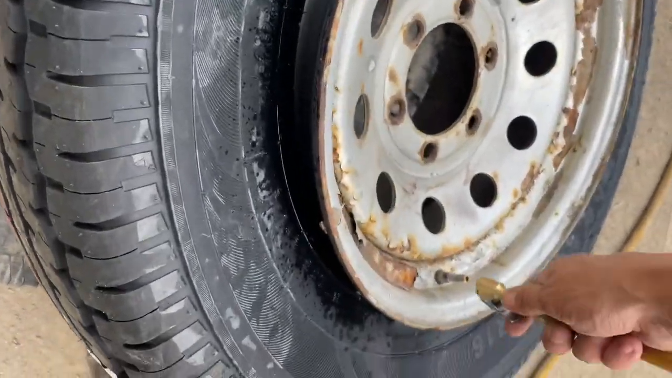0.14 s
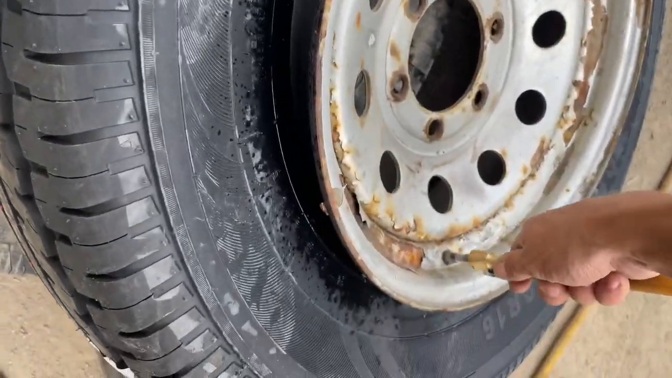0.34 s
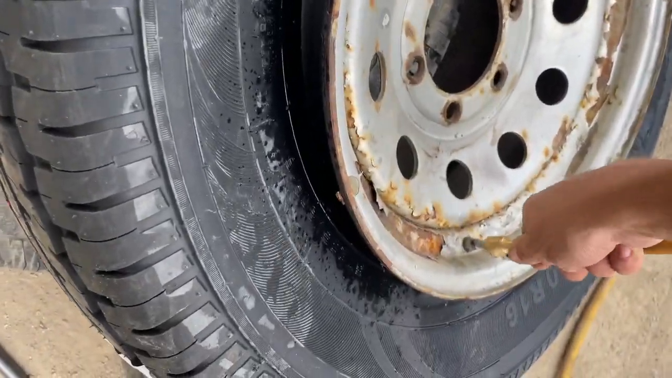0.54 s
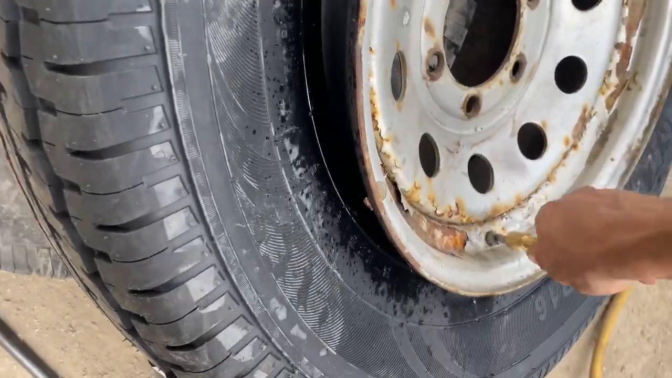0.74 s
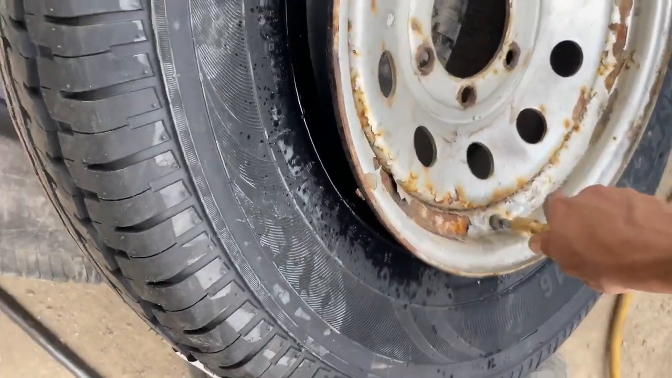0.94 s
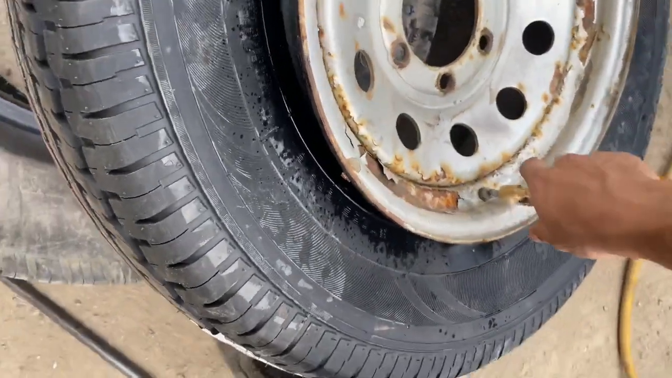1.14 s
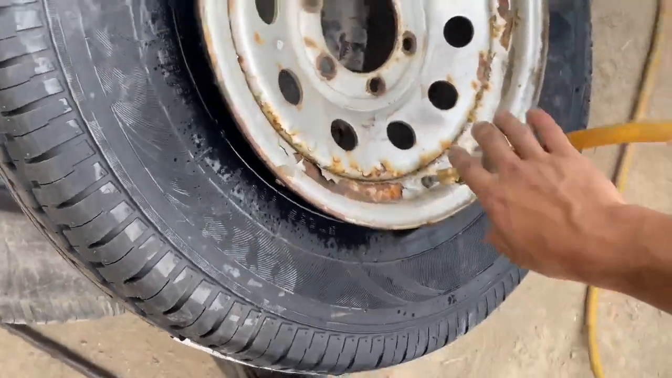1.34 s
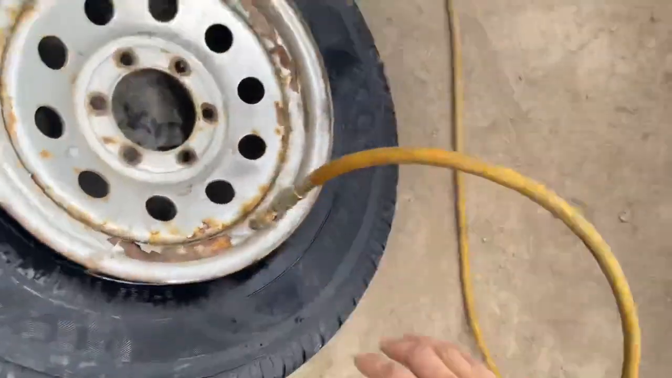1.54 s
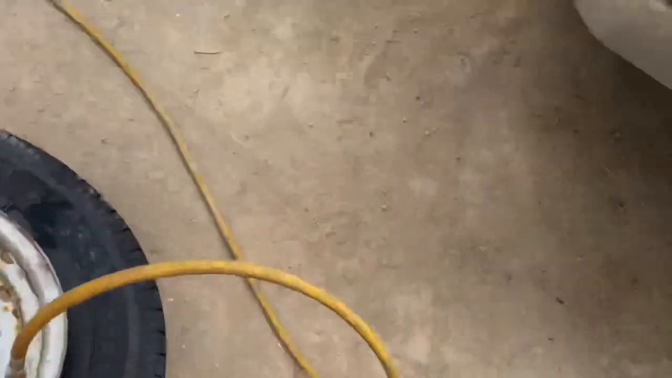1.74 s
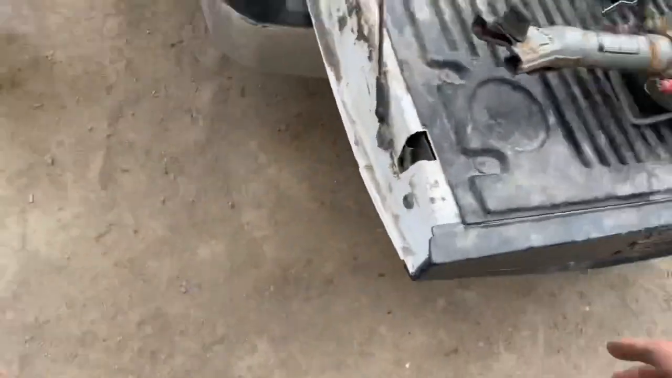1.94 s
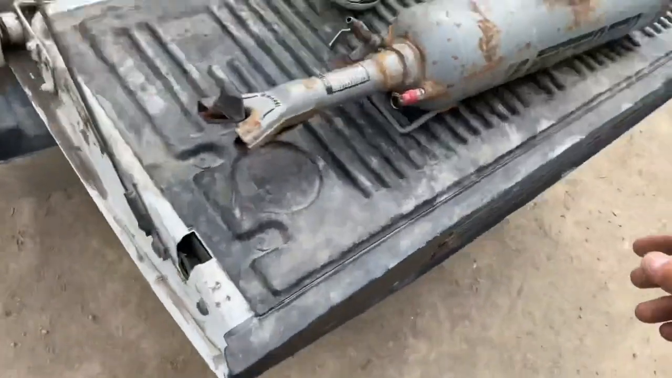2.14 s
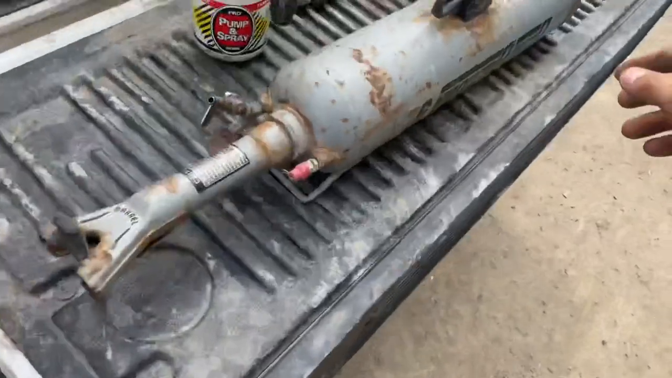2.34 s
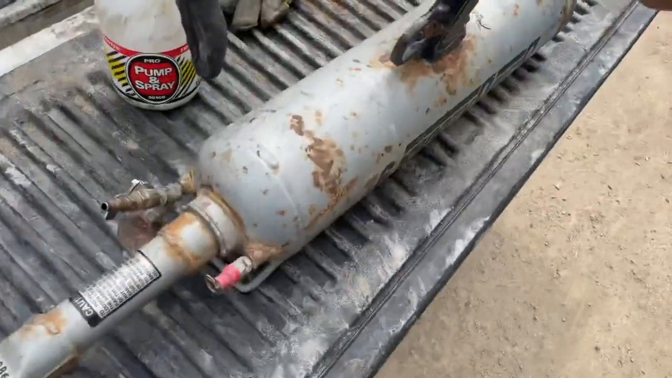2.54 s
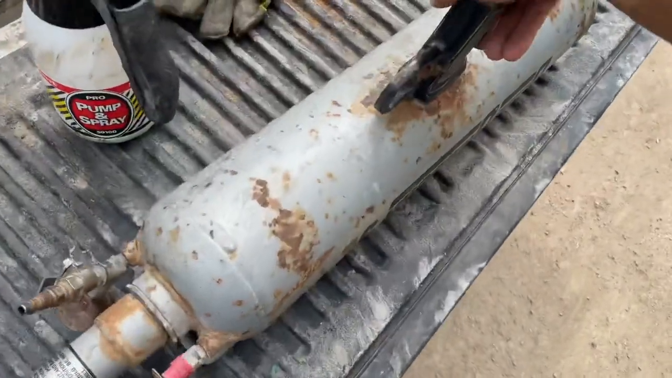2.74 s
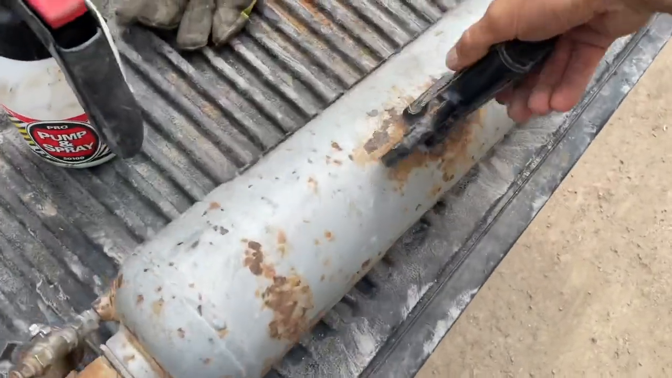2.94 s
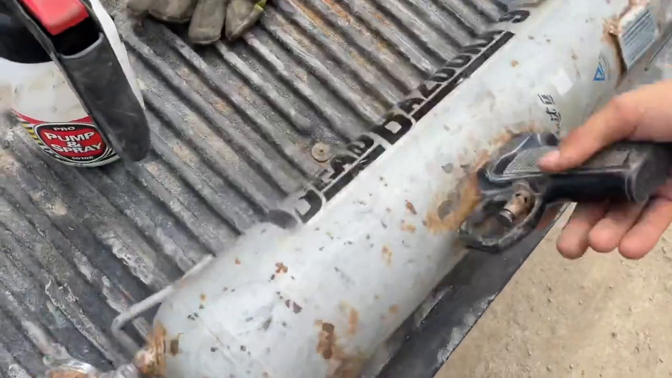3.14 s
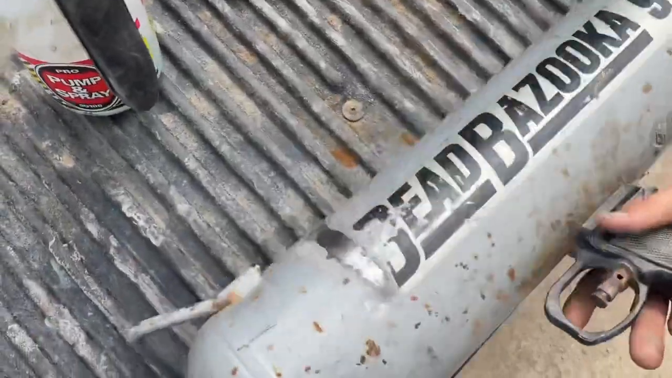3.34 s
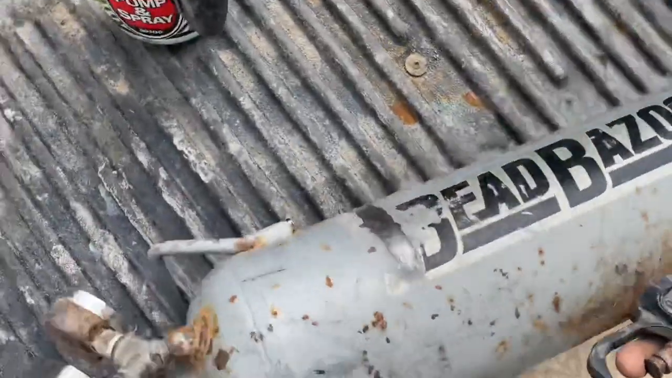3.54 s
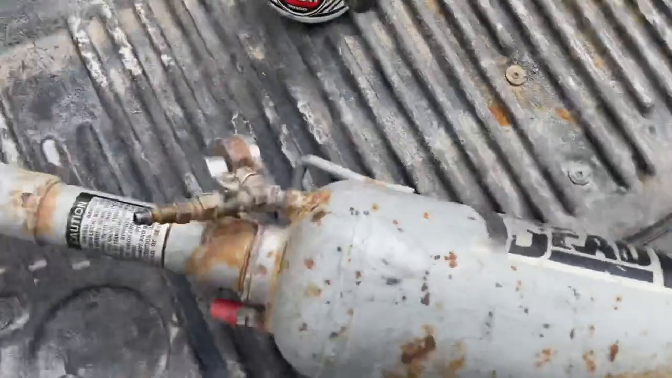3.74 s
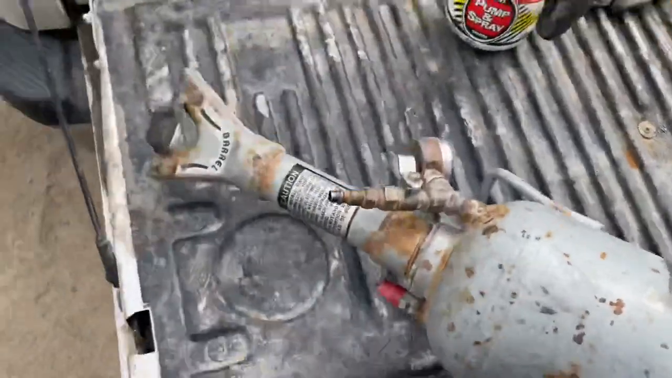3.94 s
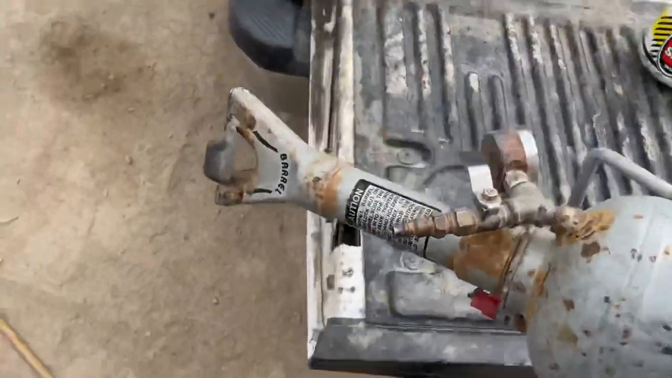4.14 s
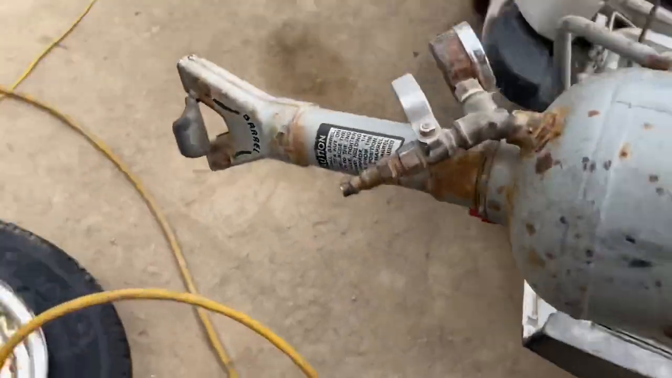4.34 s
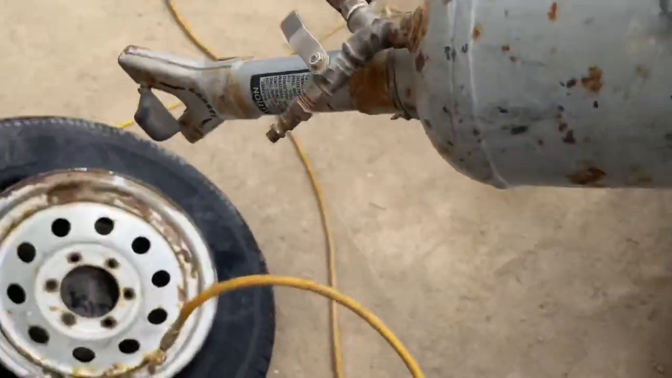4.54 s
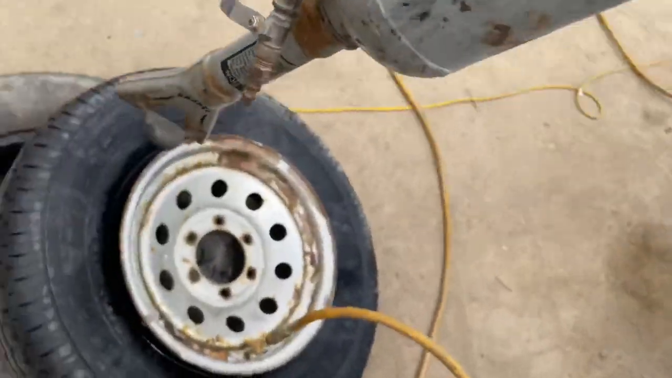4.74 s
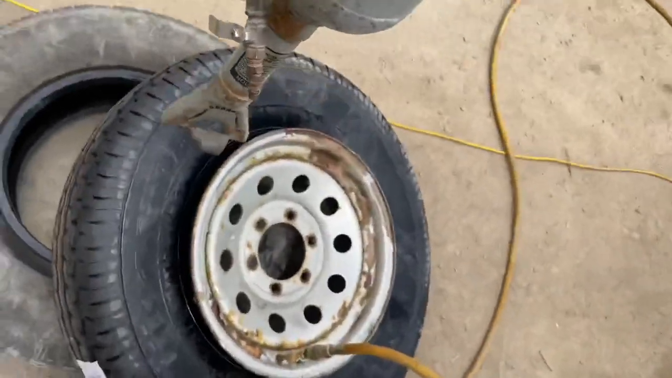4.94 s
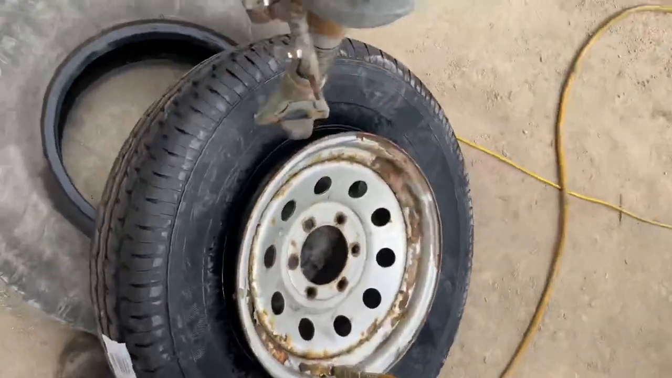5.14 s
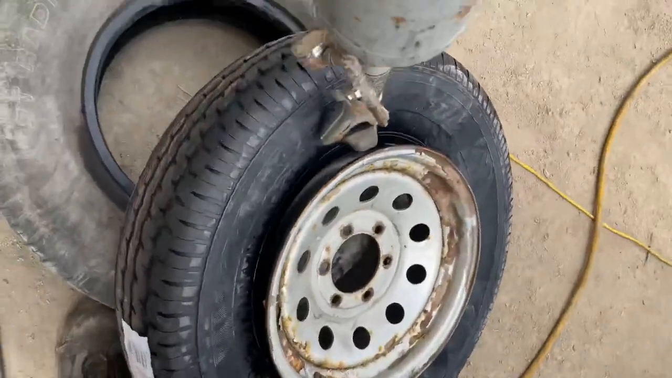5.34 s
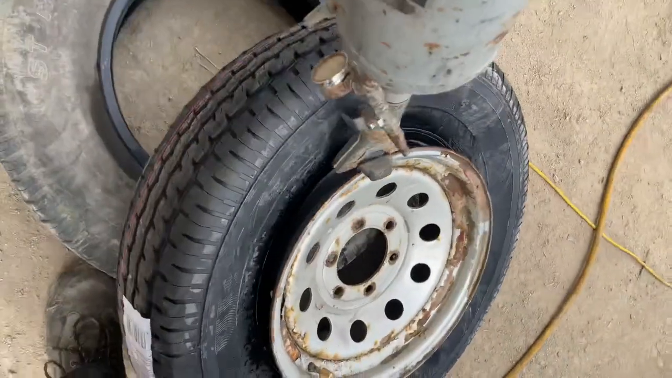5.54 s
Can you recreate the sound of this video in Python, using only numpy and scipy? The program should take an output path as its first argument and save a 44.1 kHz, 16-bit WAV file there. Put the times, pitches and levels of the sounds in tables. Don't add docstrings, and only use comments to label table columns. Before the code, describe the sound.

An air chuck ticks against a wheel and snaps onto its valve; a steady bright hiss follows, dipping mid-way, over faint engine drone.

```python
import sys
import numpy as np
from scipy import signal
from scipy.fft import next_fast_len
from scipy.io import wavfile
from scipy.ndimage import uniform_filter1d

SR = 44100
rng = np.random.default_rng(int(sys.argv[2]) if len(sys.argv) > 2 else 0)


def dump_mix(stems):
    frames = np.atleast_2d(stems).T
    limited = np.clip(frames, -1, 1)
    pcm = np.round(limited * 32767).astype(np.int16)
    wavfile.write(sys.argv[1], SR, pcm)


def amplitude_ratio(level_db):
    exponent = np.asarray(level_db, float) / 20
    return 10 ** exponent


N = 250929
HOP = 128

# start_s, level_db
YARD_LEVEL = [(0, -44), (.16, -49), (.32, -45), (.58, -43.5), (.75, -48), (1.08, -48), (1.2, -58),
              (1.73, -58.5), (2.05, -65), (2.5, -60), (2.8, -58), (3.22, -61.5), (3.5, -54), (3.88, -54.5),
              (4.4, -47.5), (5.07, -46), (5.69, -47.5)]
# start_s, half_spacing_hz, half_width_hz, shadow_lifted (0-1)
DIP_SHAPE = [(.55, 350, 60, .15), (1.36, 360, 60, .15), (1.4, 0, 150, .4), (2.2, 0, 130, .5),
             (2.48, 0, 190, .3), (2.6, 0, 120, .1), (3.3, 0, 100, .1), (3.45, 0, 150, .4),
             (3.7, 0, 140, .6), (4.58, 0, 100, .5), (4.6, 0, 190, .3), (4.78, 0, 190, .5),
             (4.81, 410, 150, .7), (4.95, 410, 150, .7), (4.98, 0, 330, .9), (5.07, 0, 200, .9),
             (5.12, 0, 340, .9), (5.22, 0, 340, .9), (5.28, 0, 210, .9), (5.42, 0, 170, .9),
             (5.44, 0, 310, .9), (5.69, 0, 300, .9)]


def evened(x):
    return x / np.sqrt(np.mean(x ** 2) + 1e-20)


def read(points, hz):
    f, *values = np.transpose(points)
    return [np.interp(np.log(hz + 1), np.log(f + 1), v) for v in values]


def follow(rows, t):
    s, *values = np.transpose(rows)
    return [np.interp(t, s, v) for v in values]


def add(mix, s, sound):
    part = mix[round(s * SR):][:len(sound)]
    part += sound[:len(part)]


def bell(hz, centre_hz, width_hz):
    return np.exp(-((hz - centre_hz) / width_hz) ** 2)


def flat(hz, centre_hz, width_hz):
    return np.exp(-((hz - centre_hz) / width_hz) ** 4)


def grid():
    return np.arange(N // HOP + 5)[:, None] * HOP / SR, np.fft.rfftfreq(4 * HOP, 1 / SR)


def streaks(shape):
    slow = uniform_filter1d(rng.standard_normal(shape), size=110, axis=0)
    return evened(uniform_filter1d(slow, size=2, axis=1))


def wander(t):
    return streaks((len(t), 2))[:, :1]


def noise_pair(field_db, same, phase, shadow_db, patchy_db):
    a, b, c, d = np.moveaxis(rng.standard_normal(field_db.shape + (4,)), 2, 0)
    same = np.clip(same, 0, 1)
    left = a + 1j * b
    right = same * left + np.sqrt(1 - same ** 2) * (c + 1j * d)
    right = right * np.exp(-1j * phase) * amplitude_ratio(-shadow_db)
    z = np.array([left, right]) * amplitude_ratio(field_db + patchy_db * streaks(field_db.shape))
    return signal.istft(z.transpose(0, 2, 1), nperseg=4 * HOP, noverlap=3 * HOP)[1][:, :N] / np.sqrt(HOP)


def lagging(x):
    bass_lead = 0.57
    return (signal.hilbert(x, next_fast_len(len(x)))[:len(x)] * np.exp(-1j * bass_lead)).real


def low_band(hz, width_hz, spread):
    pole = np.exp(-np.pi * width_hz / SR)
    ring = [1, -2 * pole * np.cos(2 * np.pi * hz / SR), pole ** 2]
    once = signal.lfilter([1], ring, rng.standard_normal((2, N)))
    low = signal.lfilter([1, -1], ring, once)
    return evened(low[0] + spread * low[1] * [[1], [-1]]) * amplitude_ratio([[1.5], [-1.5]])


def yard_layer(s, db, slope, fade_db, lift_db):
    yard_db = follow(YARD_LEVEL, s)[0] + 50
    lift = bell(s, 3.1, 1)
    return amplitude_ratio(db + slope * yard_db - fade_db * s + lift_db * lift)


def engine_throb(s):
    # start_s, level_db
    puffs = [
        (0.01, -44),
        (.097, -36),
        (.14, -35.5),
        (.235, -39),
        (.28, -32.5),
        (.33, -41),
        (.404, -34.5),
        (.442, -37),
        (.534, -41),
        (.61, -40),
    ]
    hz = 80 + 4 * evened(uniform_filter1d(rng.standard_normal(N), size=3000))
    throb = np.sin(2 * np.pi * np.cumsum(hz) / SR)
    throb *= sum(amplitude_ratio(db + 5.5) * bell(s, at, 0.026) for at, db in puffs)
    return np.array([throb, lagging(throb)]) * amplitude_ratio([[1.5], [-1.5]])


def yard():
    # pitch_hz, level_db
    drone_colour = [(90, -14), (180, -18), (232, 11), (290, -12.5), (340, -4), (450, 2), (700, -6),
                    (1200, -2.5), (1600, -6), (2500, -24.5), (4000, -32.5), (9000, -45), (13000, -48),
                    (16000, -75)]
    t, hz = grid()
    s = np.arange(N) / SR
    drone_db = follow(YARD_LEVEL, t)[0] + read(drone_colour, hz)[0] + 12
    port_phase = 2 * np.pi * hz * 14 / SR
    drone = noise_pair(drone_db, 0.94 / (1 + hz / 2500), port_phase, 0.94, patchy_db=2.0)
    drone = signal.lfilter(*signal.butter(3, 75, "high", fs=SR), drone)
    rumble = low_band(68.0, 49, spread=0.14) * yard_layer(s, db=-51.5, slope=2.5, fade_db=3.5, lift_db=16)
    hum = low_band(147.0, 60, spread=0.18) * yard_layer(s, db=-53, slope=1.6, fade_db=1.5, lift_db=12.5)
    knock = low_band(228, 78, spread=0.28) * amplitude_ratio(-47.5) * flat(s, 0, 0.89)
    return drone + rumble + hum + knock + engine_throb(s)


def clinks():
    # start_s, tick_db,
    # scrape_db, ring_db, pitch_hz
    touches = [(.003, -35, -54, -77, 4020), (.051, -40, -78, -90, 5800), (.084, -39.5, -83, -92, 8200),
               (0.312, -36, -31, -34, 2130), (0.311, -45, -66, -83, 8000), (.311, -43, -64, -90, 13000),
               (.327, -56, -73, -72, 9000), (0.351, -46, -37, -44, 3630), (.312, -44, -48, -48, 3900),
               (.351, -44, -60, -90, 2200), (0.357, -40, -47, -60, 13000), (0.363, -28, -57, -31.5, 6300),
               (.363, -42, -65, -90, 13500), (.370, -34, -47, -72, 5430), (.378, -42, -39, -70, 4430),
               (.378, -31, -52, -90, 15500), (.410, -35, -56, -90, 15500), (.357, -36, -54, -90, 15500),
               (0.403, -40, -69, -70, 13500), (0.379, -31, -61, -66, 11000), (0.388, -42, -64, -68, 12000),
               (.393, -30, -54, -90, 15500), (0.402, -37, -28, -40.5, 1570), (.410, -38, -65, -62, 10000),
               (0.456, -36, -45, -37, 13100), (.456, -60, -56, -73, 6000), (0.529, -65, -38, -90, 6800),
               (.532, -60, -34, -87, 12500), (0.534, -60, -27, -90, 3300), (.5422, -11, -42, -90, 12000)]
    # pitch_hz, level_db, t60_s
    rim_modes = [(1507, -10, .06), (1620, -3, .6), (2188, 0, .5), (2775, -26, .4), (3800, -30, .2),
                 (4100, -30, .2), (4468, -30, .14), (6335, -24, .5), (12750, 0, .045), (12350, -4, .035),
                 (13200, -6, .03)]
    miss_db = -60
    land_s, damp_db_per_s, damp_below_hz = .402, 260, 3000
    out, t = np.zeros(N), np.arange(SR // 3) / SR
    all_phases = rng.random((len(touches), len(rim_modes)))
    for (s, tick_db, scrape_db, ring_db, hz), phases in zip(touches, all_phases):
        band = signal.butter(2, [.75 * hz, min(1.3 * hz, SR // 2 - 100)], "band", fs=SR)
        tick = signal.lfilter(*band, rng.standard_normal(len(t)))
        tick *= amplitude_ratio(tick_db - 60 * t / 0.0055) + amplitude_ratio(scrape_db - 60 * t / 0.13)
        damp_db = damp_db_per_s * np.maximum(s + t - land_s, 0) * (s < land_s - .001)
        ring = np.zeros(len(t))
        for (f, db, t60), p in zip(rim_modes, phases):
            mode_db = db + miss_db * np.log2(f / hz) ** 2 - 60 * t / t60 - damp_db * (f < damp_below_hz)
            ring += amplitude_ratio(mode_db) * np.sin(2 * np.pi * (f * t + p))
        add(out, s, tick + amplitude_ratio(ring_db) * ring * np.minimum(t / 0.00016, 1))
    return np.array([out, amplitude_ratio(-3) * np.roll(out, 1)])


def bumps():
    # start_s, peak_db, start_pitch_hz, end_pitch_hz
    blows = [(0.544, -34, 910, 60), (0.565, -26.5, 493, 70), (0.611, -22.5, 810, 94), (.634, -13, 900, 49),
             (0.655, -20, 880, 55.3), (.948, -22, 790, 98), (0.964, -18, 910, 63.6),
             (0.971, -17.5, 2580, 71.6), (0.989, -12.5, 1370, 41.2), (1.02, -20, 880, 61),
             (1.029, -23, 785, 44), (1.062, -16, 1290, 73), (1.104, -28.5, 806, 90), (1.124, -31, 600, 201),
             (1.149, -25.5, 1570, 150), (1.157, -28, 1190, 84), (1.172, -38, 700, 119),
             (3.36, -44, 250, 140), (3.412, -39, 600, 303), (3.43, -39.5, 497, 200), (3.45, -39, 490, 250),
             (3.475, -43, 500, 300), (3.573, -38, 700, 450), (3.579, -22, 720, 410),
             (3.590, -24.5, 594, 300), (3.596, -28.5, 504, 250), (3.606, -36, 497, 248),
             (3.620, -33.5, 220, 140)]
    out, t = np.zeros(N), np.arange(SR // 6) / SR
    for s, db, start_hz, end_hz in blows:
        t60 = 0.03 + 3 / end_hz
        hz = end_hz + (start_hz - end_hz) / (1 + t * start_hz / 2.57) ** 1.884
        rattle = evened(signal.lfilter(*signal.butter(1, 900, fs=SR), rng.standard_normal(len(t))))
        blow = np.sin(2 * np.pi * np.cumsum(hz) / SR) + 0.5 * rattle * amplitude_ratio(-60 * t / 0.096)
        add(out, s, blow * amplitude_ratio(db - 60 * t / t60) * np.minimum(t / 0.0026, 1))
    return np.array([out, amplitude_ratio(-4) * lagging(np.roll(out, 11))]) * amplitude_ratio(2.)


def valve(s):
    seat_s = .5425
    leak_db = -1 + 3000 * (s - seat_s)
    burst_db = 7 * bell(s, seat_s, .016)
    return np.where(s < seat_s, leak_db, burst_db)


def jet_spectrum(t, hz, level_db, far, aim):
    # pitch_hz, level_db
    near_colour = [(500, -10.5), (1120, -8), (1400, -12.5), (2400, 1.5), (3200, 9), (4000, 8), (4800, 7),
                   (6200, 1.5), (7500, 11.5), (9000, 8), (10200, 5.5), (12000, 6.5), (13500, -1.5),
                   (15800, -4)]
    far_colour = [(500, -3), (1120, 11), (1400, 19), (2000, 10.5), (3200, 7.5), (4000, 5), (4800, 2),
                  (6200, 17.5), (7500, 5.5), (9000, 9), (10200, 11), (12000, 5.5), (13500, 2.5),
                  (15800, 8.5)]
    # start_s, pitch_hz, depth_db
    ground_echo = [
        (1.15, 600, 0),
        (1.45, 750, -9),
        (1.65, 720, -12),
        (1.95, 1100, -7),
        (2.2, 1900, 0),
    ]
    field_db = level_db - 4 + (1 - far) * read(near_colour, hz)[0] + far * read(far_colour, hz)[0]
    field_db += aim * 12.5 * bell(hz, 12770, 2490)
    field_db += 0.6 * bell(hz, 1900, 4200)
    field_db -= (17 + 6 * wander(t)) * bell(hz, 5640 + 55 * wander(t), 140)
    field_db -= 5 * bell(hz, 7490, 205) + 4 * bell(hz, 3710, 130)
    flutter = evened(uniform_filter1d(rng.standard_normal(t.shape), size=25, axis=0))
    field_db += 0.86 * flutter
    echo_hz, echo_db = follow(ground_echo, t)
    return field_db + echo_db * bell(hz, echo_hz, .42 * echo_hz)


def direct_line(t):
    # start_s, end_s, share_lost (0-1)
    blocked = [
        (1.68, 2.0, .14),
        (2.2, 2.44, .17),
        (2.54, 3.4, .13),
        (3.57, 3.66, .12),
        (4.0, 4.48, .1),
        (5.27, 5.44, .008),
    ]
    lost = 0
    for a, b, share in blocked:
        lost = lost + share * (np.tanh((t - a) / .05) - np.tanh((t - b) / .05)) / 2
    return np.clip(.996 - lost, 0, 1)


def port_delay(t, hz, far, steep, dip_hz):
    turn = np.pi * ((hz + 1) / dip_hz) ** np.where(hz < dip_hz, np.clip(steep, .2, 3), 1.3)
    turn -= np.clip(.2 + .4 * (steep - 1), .04, .44) * np.sin(2 * turn)
    opposed = bell(turn, np.pi, .8)
    turn += .6 * bell(hz, 700, 500) * (1 - far)
    turn += np.pi * (1 + np.tanh((hz - 780) / 260)) * (t < 1.38)
    turn += .8 * streaks(turn.shape) * (1.12 - opposed)
    turn += .15 * np.sin(2 * np.pi * hz / 720 + 1.5 * t) * (1 - far)
    return turn, opposed


def treble_likeness(t, hz):
    # pitch_hz, left_lead_rad, likeness (0-1)
    ports = [(5000, 5.5, .3), (6500, 5.2, .45), (7500, 3.7, .65), (8300, 3.45, .75), (8900, 3.25, .95),
             (9350, 3.12, .99), (9900, 2.6, .8), (11000, 1.8, .78), (12200, .8, .82), (13000, 0., 1.)]
    # start_s, pitch_hz, likeness_lost just below it (0-1)
    opposite = [(.55, 8900, 0), (.82, 8950, 0), (.92, 9250, .3), (1.5, 9250, .25), (1.9, 9400, .25),
                (3.4, 9350, .15), (3.6, 9600, .3), (4.15, 9550, .2), (4.3, 9200, 0), (4.6, 9250, .2),
                (4.8, 9200, 0), (5.69, 9200, 0)]
    opposite_hz, lost = follow(opposite, t)
    phase, same = read(ports, hz * 9300 / opposite_hz)
    same = same * (1 - lost * bell(hz, opposite_hz - 750, 500))
    return same * np.exp(1j * phase)


def cancelling(t, hz, dip_hz):
    # start_s, end_s,
    # pitch_hz, half_width_hz, share (0-1)
    thin_dips = [(.56, .72, 5720, 190, 1), (.8, 1.13, 5650, 240, 1), (1.18, 1.41, 5650, 220, 1),
                 (.56, .79, 7580, 290, 1), (.82, 1.06, 7320, 270, 1), (.56, .77, 2980, 150, 1),
                 (.55, .6, 3620, 150, 1), (.77, .81, 3680, 200, 1), (.83, 1.28, 3630, 175, 1),
                 (1.31, 1.41, 3630, 175, 1), (.91, 1.04, 2750, 110, 1), (1.1, 1.2, 2900, 140, 1),
                 (1.04, 1.14, 6250, 80, .95), (1.42, 1.51, 3270, 170, 1), (3.74, 3.9, 2550, 90, .85),
                 (4.58, 4.97, 1520, 170, .7), (4.67, 4.8, 3880, 80, .95), (4.72, 4.8, 2550, 90, .95),
                 (5.32, 5.42, 2700, 80, .9)]
    gap_hz, width_hz = follow(DIP_SHAPE, t)[:2]
    dip_hz = dip_hz + 25 * wander(t)
    share = np.maximum(flat(hz, dip_hz - gap_hz, width_hz), flat(hz, dip_hz + gap_hz, width_hz))
    for a, b, thin_hz, thin_width_hz, part in thin_dips:
        present = flat(t, (a + b) / 2, (b - a) / 2)
        share = np.maximum(share, part * present * flat(hz, thin_hz, thin_width_hz))
    return share


def port_shadow(t, hz, far, shadow_db, opposed):
    shade = (1 - follow(DIP_SHAPE, t)[2] * opposed) * hz / (hz + 300)
    shade = shade * (1 - 0.38 * bell(hz, 6350, 620)) / (1 + (hz / 7450) ** 24)
    shade_db = shadow_db * shade - 4.1 * far * bell(hz, 9500, 350)
    return shade_db + 3.5 * streaks(opposed.shape) * (1 - opposed) / (1 + (hz / 8200) ** 12)


def jet():
    # start_s, level_db, distance (0 near - 1 far), nozzle_aim (about 0-1)
    walk = [(.56, -22, 0.38, .6), (.78, -28.5, 0.26, .85), (.93, -23.5, 0.38, .75), (1.06, -25, 0.42, .9),
            (1.32, -27.5, 0.52, .8), (1.55, -29, 0.51, .8), (1.76, -32.5, 0.72, 1), (1.96, -36, 0.79, 1),
            (2.24, -41.5, 0.78, .55), (2.6, -39, 0.74, .45), (3.06, -38.5, 0.71, .4),
            (3.5, -37.5, 0.76, .55), (3.85, -34, 0.69, .65), (4.2, -32, 0.59, .9), (4.4, -32.5, 0.64, 1.1),
            (4.65, -29.5, 0.46, .8), (4.96, -27.5, 0.44, .4), (5.69, -27, 0.31, .55)]
    # start_s, right_shadow_db, phase_steepness below the dip
    side_on = [(.55, 6.5, 1.4), (.85, 6.5, 1.6), (1.4, 8, 2.1), (1.72, 8.5, 0.37), (2.15, 13, 1.3),
               (2.8, 17.5, 0.27), (3.4, 10, 0.46), (3.8, 11.5, 1.94), (4.4, 6.5, 1.2), (4.58, 13, 2.2),
               (4.62, 7, 1.2), (5.1, 7, 1.2), (5.69, 6, 3.8)]
    # start_s, dip_hz where the ports are half a cycle apart
    turning = [(.55, 3300), (.86, 3230), (1.1, 3270), (1.36, 3270), (1.4, 2780), (1.65, 2720), (1.74, 1950),
               (2.1, 1750), (2.45, 2700), (3.1, 2800), (3.42, 2250), (3.55, 2200), (3.66, 1680),
               (4.0, 1620), (4.2, 1480), (4.58, 1480), (4.6, 3230), (4.95, 3220), (5.15, 3350),
               (5.35, 3100), (5.69, 3150)]
    t, hz = grid()
    level_db, far, aim = follow(walk, t)
    far = np.clip(far, 0, 1)
    shadow_db, steep = follow(side_on, t)
    dip_hz = follow(turning, t)[0]
    field_db = jet_spectrum(t, hz, level_db, far, aim)
    turn, opposed = port_delay(t, hz, far, steep, dip_hz)
    direct = direct_line(t)
    alike = .8 * direct * (1 - (1 - opposed) * np.clip(.1 + hz / 9000, 0, 1))
    treble = 1 / (1 + (5200 / (hz + 1)) ** 12)
    pair = (1 - treble) * alike * np.exp(1j * turn) + treble * treble_likeness(t, hz)
    mirror = cancelling(t, hz, dip_hz)
    pair = (1 - mirror) * pair - mirror * direct
    shade_db = port_shadow(t, hz, far, shadow_db, opposed) * (1 - mirror)
    air = noise_pair(field_db, abs(pair), np.angle(pair), shade_db, patchy_db=2.5)
    return air * amplitude_ratio(valve(np.arange(N) / SR))


def scene():
    return yard() + clinks() + bumps() + jet()


def low_pass(x):
    return signal.sosfilt(signal.butter(12, 17090, fs=SR, output="sos"), x)


def record(dry):
    edge = signal.firwin(1201, 15850, window=("kaiser", 8), fs=SR)
    x = signal.oaconvolve(dry, edge[None], "same")
    x = signal.lfilter(*signal.butter(3, 38, "high", fs=SR), x)
    return low_pass(x)


dry = scene()
out = record(dry)
dump_mix(out)
```